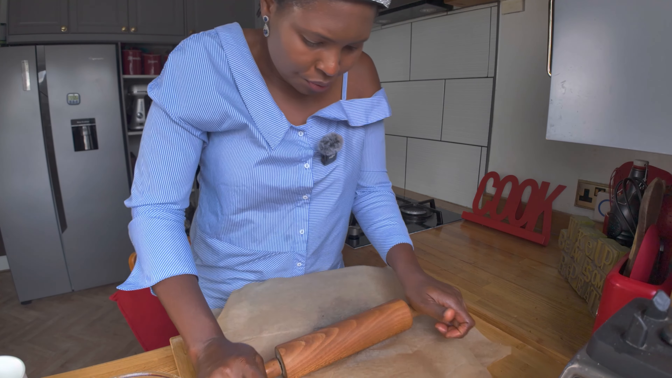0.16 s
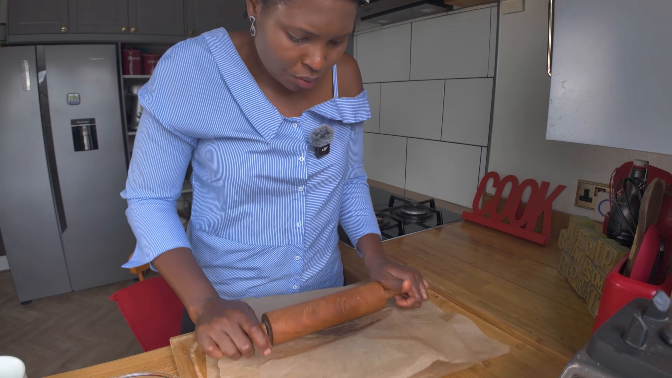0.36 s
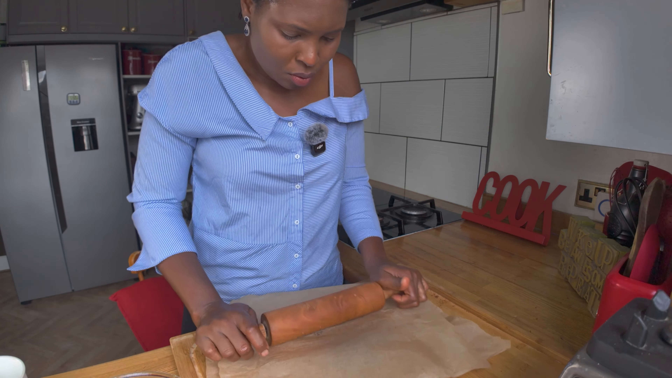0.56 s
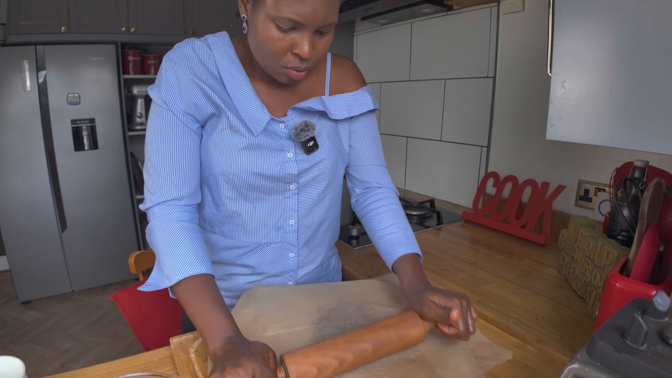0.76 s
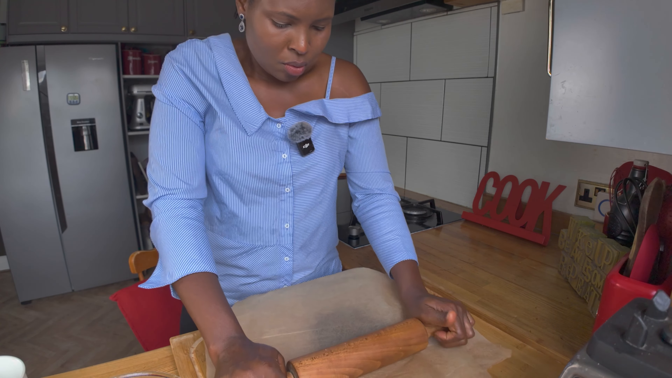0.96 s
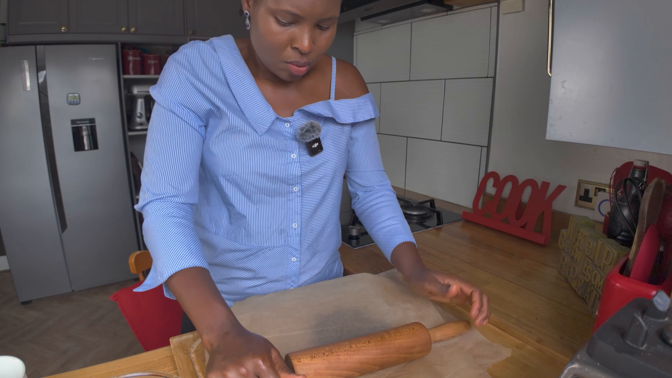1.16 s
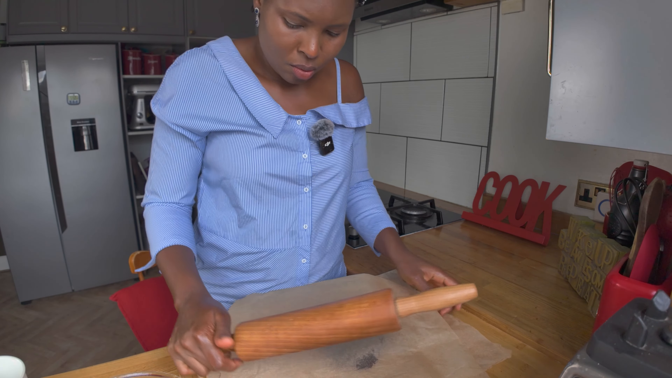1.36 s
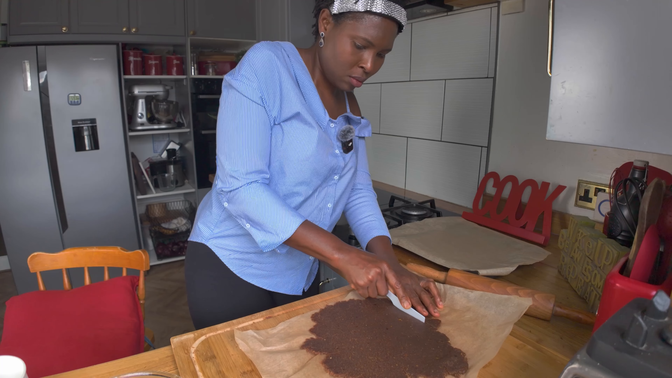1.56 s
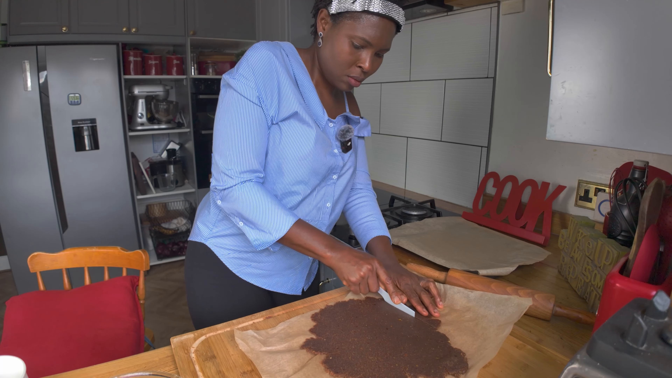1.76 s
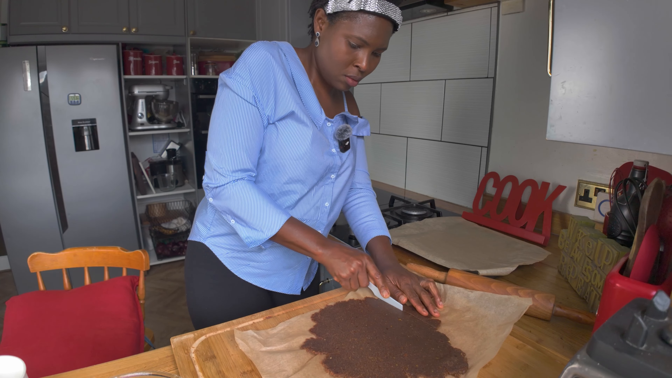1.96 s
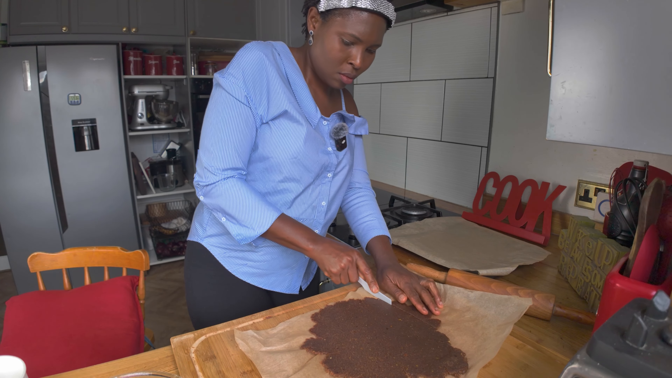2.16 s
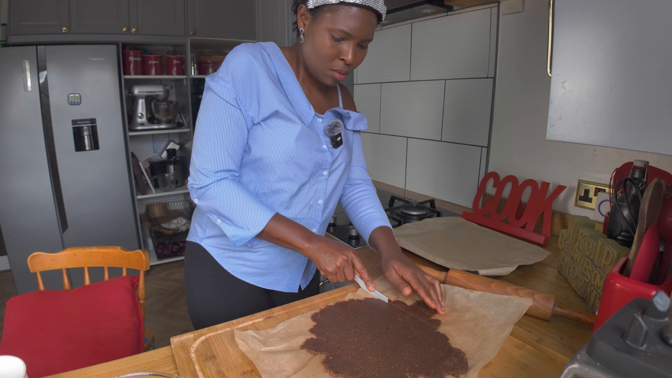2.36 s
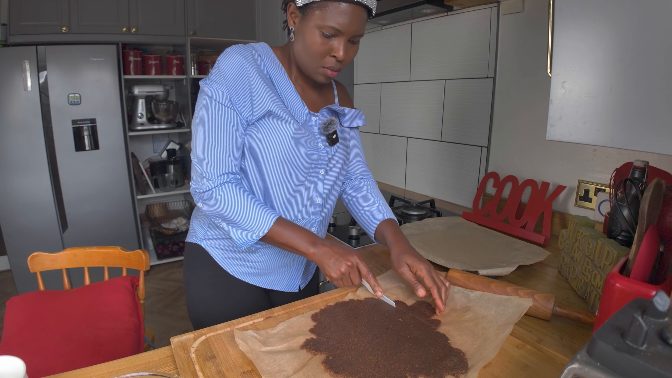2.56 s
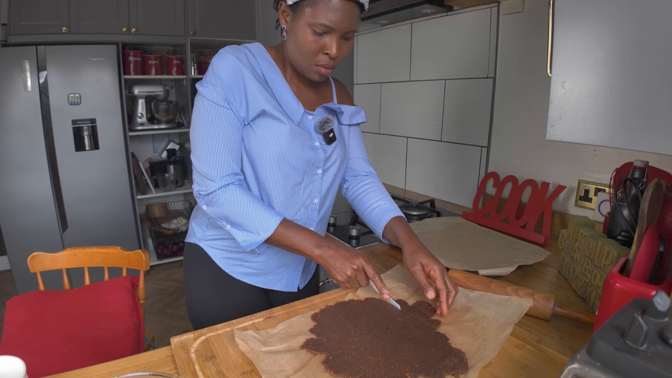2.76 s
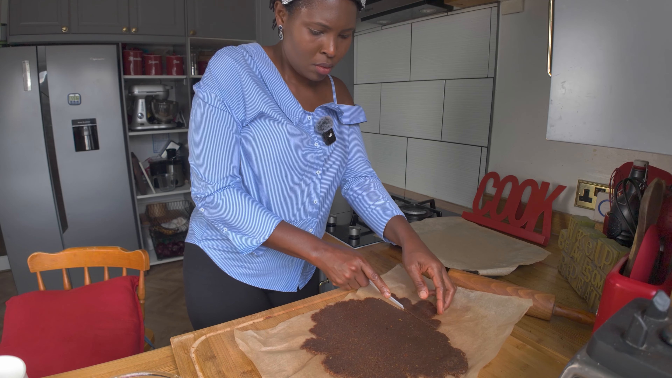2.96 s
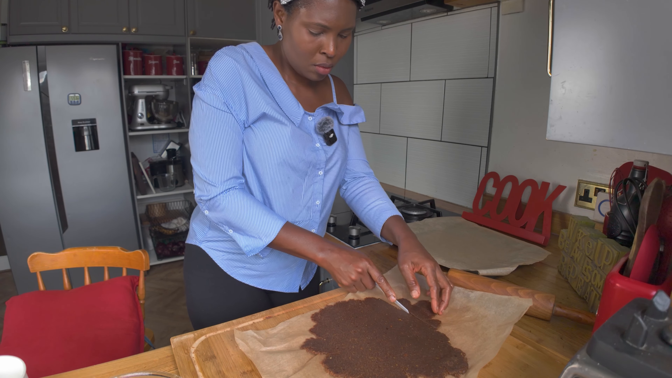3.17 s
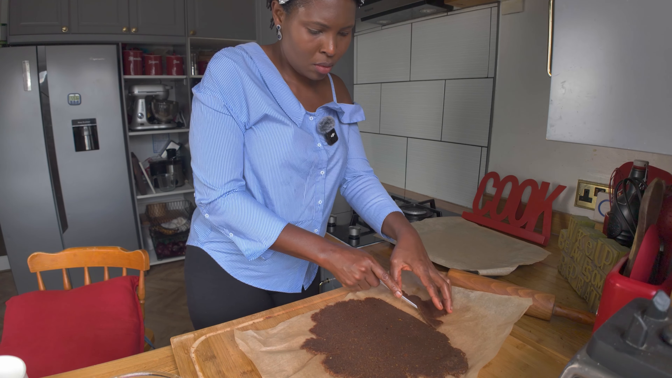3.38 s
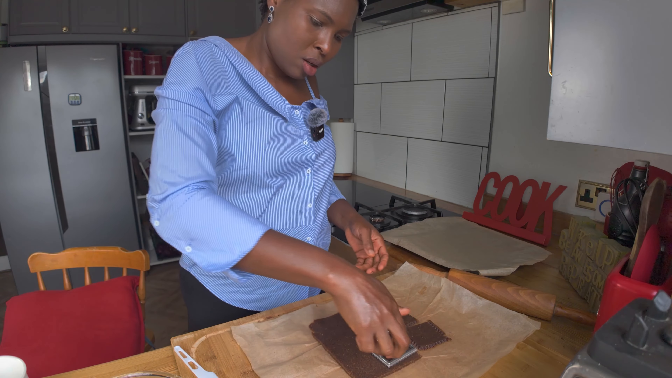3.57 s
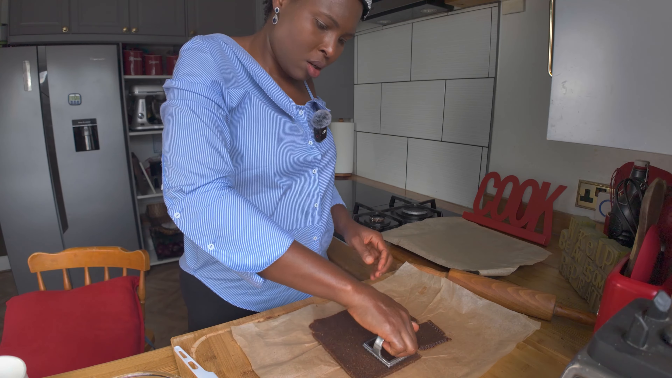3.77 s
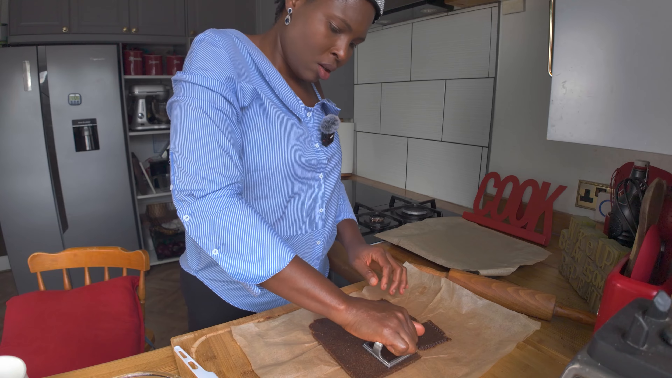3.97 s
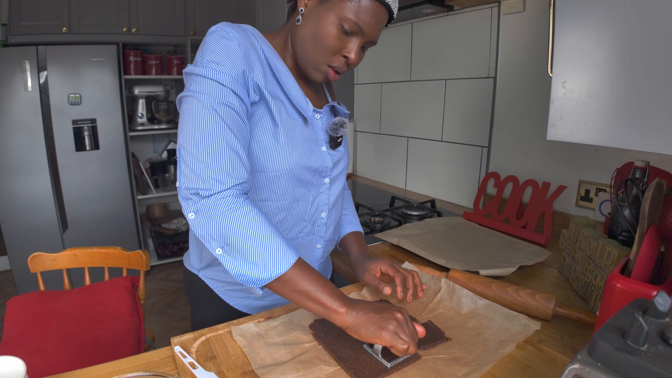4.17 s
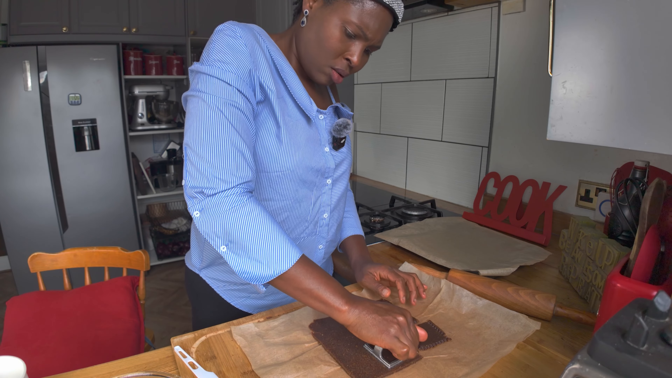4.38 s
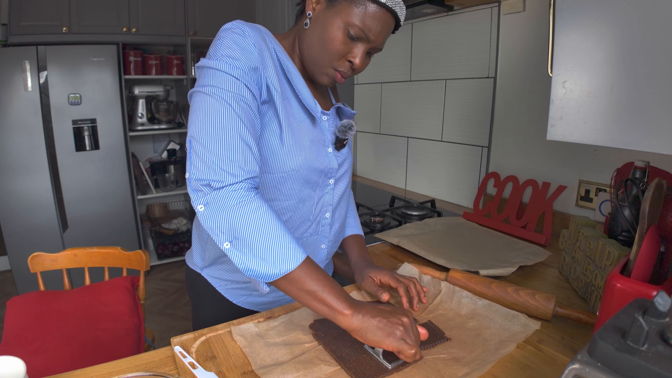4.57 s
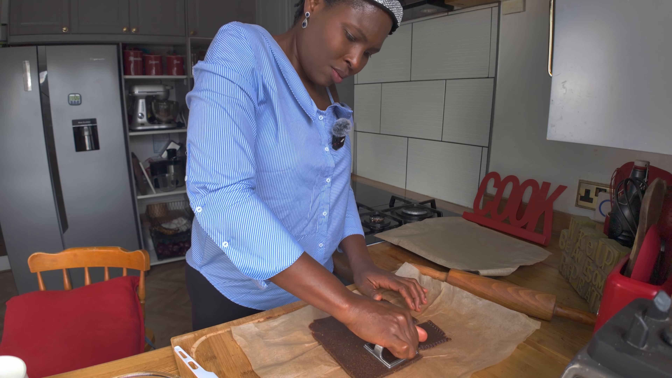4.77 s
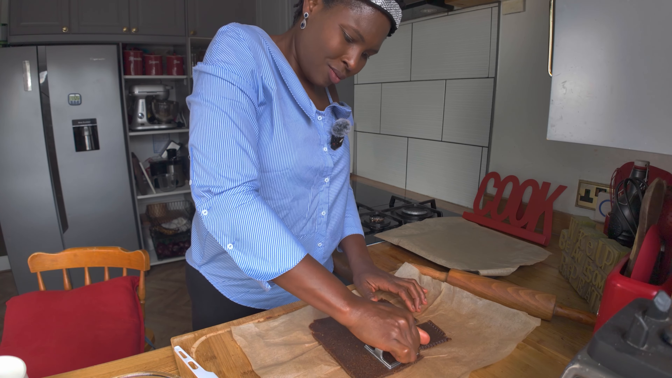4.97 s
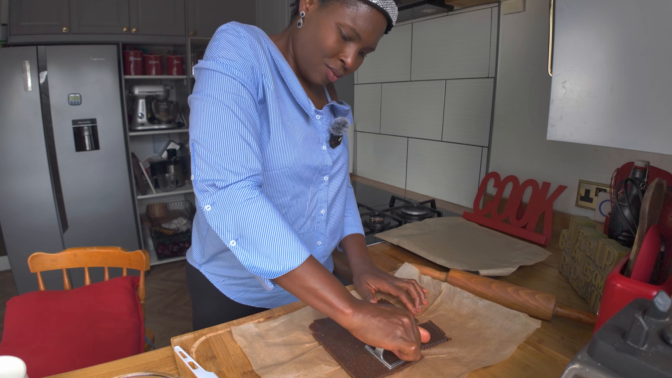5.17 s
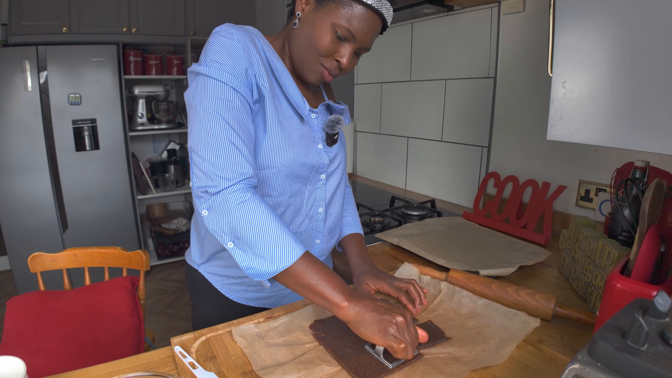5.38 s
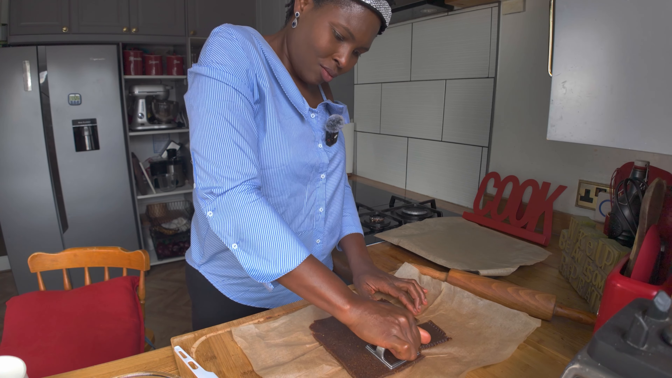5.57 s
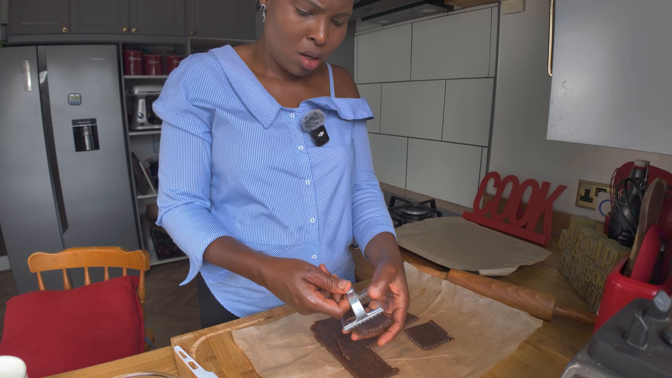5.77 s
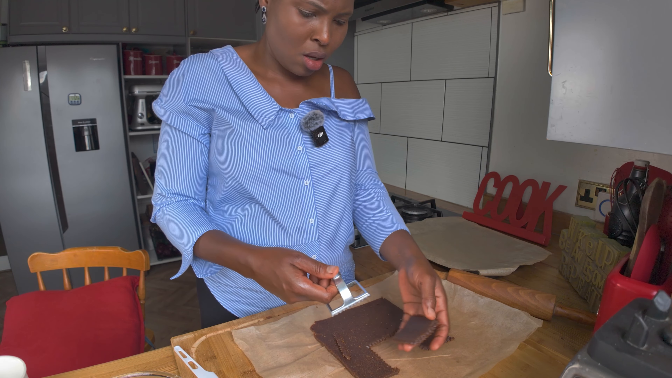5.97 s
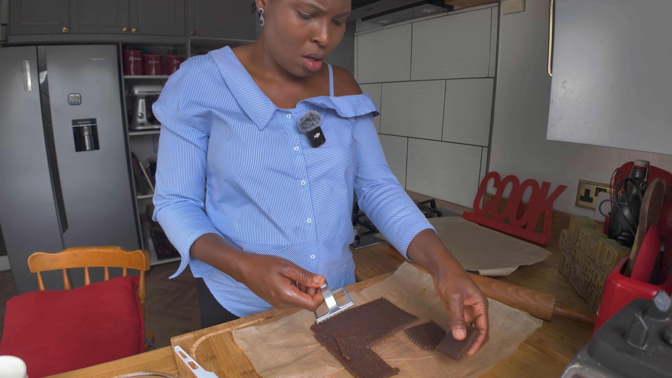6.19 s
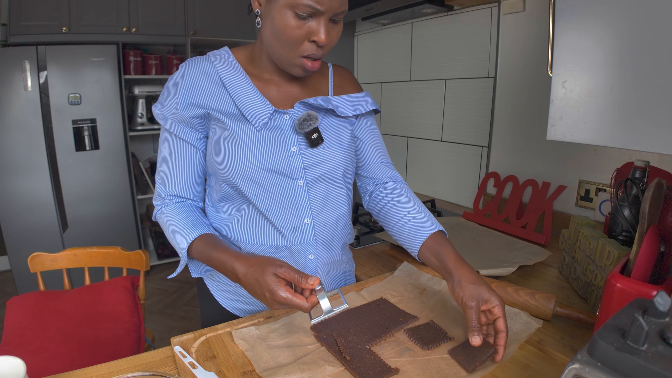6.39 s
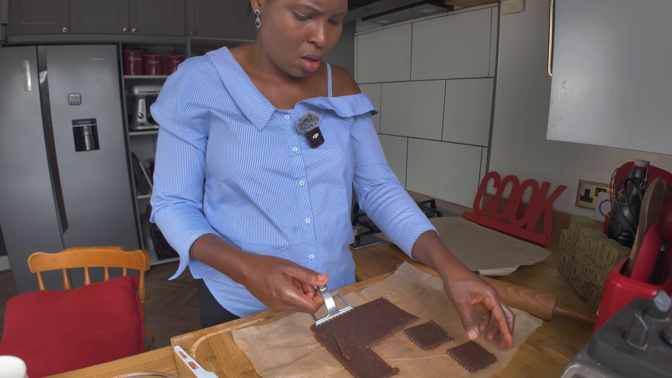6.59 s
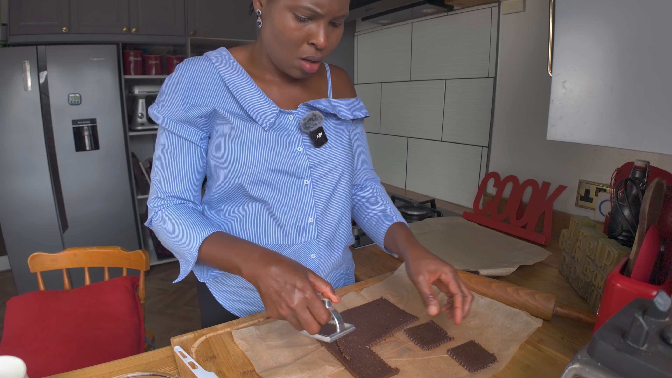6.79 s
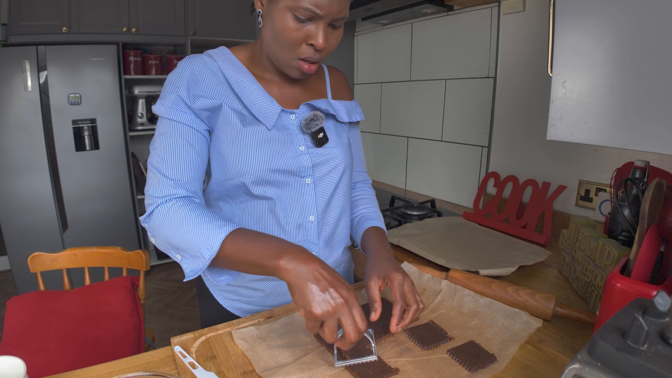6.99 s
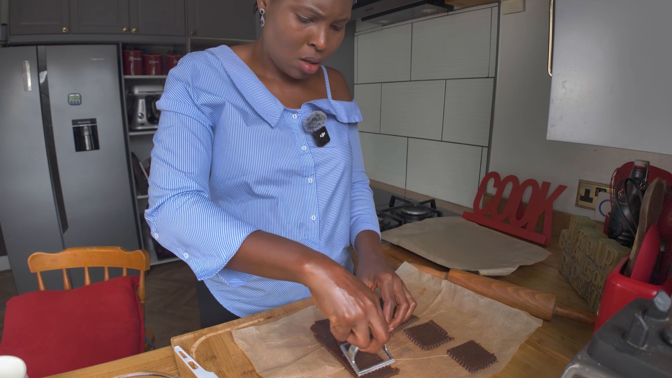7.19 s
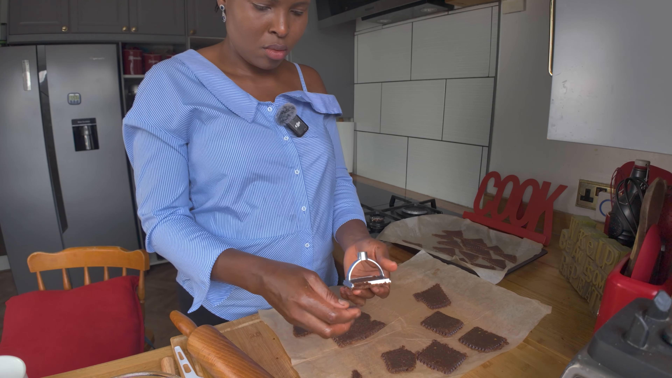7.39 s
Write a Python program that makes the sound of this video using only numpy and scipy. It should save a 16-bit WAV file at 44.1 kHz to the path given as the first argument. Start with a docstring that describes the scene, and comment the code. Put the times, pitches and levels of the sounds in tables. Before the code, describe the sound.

Close, crisp paper crinkling with wooden rumble and table knocks, dropping to faint rustles, a burst of sharp ticks, soft cloth swishes and near quiet.

```python
"""In a home kitchen, dough is rolled, trimmed and stamped out on parchment paper on a wooden table.
The sheet crackles: crowds of small ringing creases, and single snaps made of short noise bursts.
A sleeve swishes and the rolling pin rumbles (shaped noise); the table thuds (short low noise knocks).
Murmur, hiss and hum lie beneath. A microphone on the shirt hears five passages, with a brief dip
in level at each join."""
import sys
import numpy as np
from scipy import signal
from scipy.fft import rfft, irfft
from scipy.io import wavfile
from scipy.ndimage import uniform_filter1d

SR = 44100
rng = np.random.default_rng(int(sys.argv[2]) if len(sys.argv) > 2 else 0)


def int16_out(signal):
    """Quantize to a 16-bit WAV file."""
    q = np.round(np.clip(np.atleast_2d(signal).T, -1, 1) * 32767)
    wavfile.write(sys.argv[1], SR, q.astype(np.int16))


N = 328104


def amp(db):
    """Turn a level in dB into a gain."""
    return 10 ** (np.asarray(db) / 20)


def rms_one(x):
    """Scale a sound to an rms of 1."""
    return x / np.sqrt(np.mean(x ** 2) + 1e-20)


def in_time(tables):
    """Draw each table column as a curve over time, plus a gain that is 0 between the tables."""
    t = np.arange(N) / SR
    times, *columns = np.transpose(np.vstack(tables))
    inside = sum((t >= rows[0][0]) & (t <= rows[-1][0]) for rows in tables) > 0
    curves = [np.interp(t, times, column) for column in columns]
    return curves + [uniform_filter1d(inside * 1., size=300)]


def band(x, low_hz, high_hz):
    """Keep mainly what lies between two frequencies, with gentle slopes."""
    edges = [low_hz, min(high_hz, .45 * SR)]
    return signal.sosfilt(signal.butter(2, edges, "band", fs=SR, output="sos"), x)


def high_pass(x, hz):
    """Weaken what lies below a frequency."""
    return signal.sosfilt(signal.butter(3, hz, "high", fs=SR, output="sos"), x)


def ring(x, hz, t60):
    """Let each click in x start a sine that dies by 60 dB in t60 seconds."""
    r, w = amp(-60 / (t60 * SR)), 2 * np.pi * hz / SR
    return signal.lfilter([0, np.sin(w)], [1, -2 * r * np.cos(w), r * r], x + 1e-18)


def coloured(points):
    """Make noise with the given spectrum, at an rms of 1."""
    hz, db = np.transpose(points)
    f = np.arange(N // 2 + 1) * SR / N + 1
    shape = amp(np.interp(np.log(f), np.log(hz), db))
    return rms_one(irfft(rfft(rng.standard_normal(N)) * shape, N))


# The passages and their background: end t/s, murmur level/dB, hiss level/dB,
# extra level of both at the passage's start/dB
PASSAGES = [(1.554, -62, -59, 6), (3.452, -66.5, -70.5, -3.5), (5.631, -67.5, -68.5, 13.5),
            (7.27, -67.5, -74, -10.5), (7.44, -67, -74.5, -10.5)]
# Spectrum of the murmur: f/Hz, relative level per Hz/dB
MURMUR_COLOUR = [(18, -42), (30, -21.5), (215, -9.5), (327, -10.5), (397, -9.5), (449, -10.5), (616, -10),
                 (685, -10), (2000, -22), (2600, -60.5), (4400, -120)]
# Spectrum of the background hiss: f/Hz, relative level per Hz/dB
HISS_COLOUR = [(710, -38), (1200, -8.5), (1840, -11.5), (2260, -2.5), (3460, -3), (3850, -8), (6650, -6.5),
               (15500, -40.5)]
SETTLE_S = 0.1   # time constant with which the extra level dies away
MURMUR_LUMPS_DB = 1.2   # rms unevenness of the murmur
HUM_HZ, HUM_DB = 50.5, -84.5


def room_tone():
    """The low murmur of the house and a thin hiss are shaped noise; mains hum is a faint sine."""
    ends, murmur_db, hiss_db, start_db = np.transpose(PASSAGES)
    t = np.arange(N) / SR
    passage = np.minimum(np.searchsorted(ends, t), len(ends) - 1)
    since_start = t - np.r_[0, ends][passage]
    settle_db = start_db[passage] * np.exp(-since_start / SETTLE_S)
    lumps_db = MURMUR_LUMPS_DB * rms_one(band(rng.standard_normal(N), 2.1, 16))
    murmur = amp(murmur_db[passage] + settle_db + lumps_db) * coloured(MURMUR_COLOUR)
    hiss = amp(hiss_db[passage] + settle_db) * coloured(HISS_COLOUR)
    hum = amp(HUM_DB) * np.sin(2 * np.pi * HUM_HZ * t)
    return murmur + hiss + hum


# How the room echoes: f/Hz, time to die by 60 dB t/s, level relative to the other rows/dB
KITCHEN = [(523, 0.46, 12.5), (1580, 0.57, 0), (3380, 0.19, 2), (6250, 0.34, -4.5), (12460, 0.067, 12)]
KITCHEN_DB = -4.5   # energy of the whole tail against the direct sound
EARLY_DB, EARLY_S = 9, 0.045   # the start of the tail is thicker and thins out: extra level/dB, time constant/s
TABLE_ECHO_S, TABLE_ECHO_DB = 0.002, -21


def kitchen():
    """The room answers a click with the click itself, a table echo and a tail that dies by band."""
    t = np.arange(SR // 2) / SR
    tail = 0
    for hz, t60, db in KITCHEN:
        tail = tail + amp(db - 60 * t / t60) * band(rng.standard_normal(len(t)), hz / 1.89, hz * 1.16)
    build_up = np.clip(t / 0.0084, 0, 1)
    tail = tail * build_up * amp(EARLY_DB * np.exp(-t / EARLY_S))
    response = amp(KITCHEN_DB) * tail / np.sqrt(np.sum(tail ** 2))
    response[0] += 1   # direct sound
    response[round(TABLE_ECHO_S * SR)] += amp(TABLE_ECHO_DB)
    return response


# Sleeve sliding as an arm reaches out: loudest moment t/s, level there/dB, rise t/s, fall t/s
SWISHES = [(3.509, -49.5, 0.037, 0.18), (3.95, -58.5, 0.11, 0.17), (6.19, -49.5, 0.15, 0.14),
           (7.08, -53.5, 0.13, 0.14)]
# Spectrum of the sleeve: f/Hz, relative level per Hz/dB
SWISH_COLOUR = [(240, -28), (600, -12), (1490, -11), (2230, -3.5), (3600, 1.5), (4200, -6), (7000, -17),
                (11000, -35.5), (22000, -120)]
SWISH_EDGE_DB, SWISH_FLAT = 15, 2.4   # drop one rise or fall time away; higher = flatter top


def sleeve():
    """Cloth rubbing makes noise that swells smoothly and fades with each reach."""
    t = np.arange(N) / SR
    swell = 0
    for s, db, rise, fall in SWISHES:
        distance = np.maximum((s - t) / rise, (t - s) / fall)
        swell = swell + amp(db - SWISH_EDGE_DB * distance ** SWISH_FLAT)
    return swell * coloured(SWISH_COLOUR)


# Pin, hand and cutter on the table: t/s, peak level/dB, table ring f/Hz, time to die by 60 dB t/s
THUDS = [(.04, -43, 121, 0.24), (0.151, -46.5, 110, 0.16), (0.2, -41, 261, 0.36), (0.45, -31, 227, 0.34),
         (0.951, -19, 250, 0.2), (0.964, -34.5, 110.8, 0.27), (1.231, -42.5, 358, 0.18),
         (1.5, -39, 400, 0.14), (1.82, -52, 300, 0.1), (2.11, -51.5, 171, 0.38), (3.64, -38.5, 185, 0.12),
         (3.718, -58.5, 129.3, 0.11), (5.336, -42.5, 654, 0.18), (6.679, -35.5, 486, 0.21)]


def thuds():
    """A soft push shakes the damped table top: dying noise around the struck spot's pitch."""
    size = 8000   # samples; each knock is cut off here
    out = np.zeros(N + size)
    t = np.arange(size) / SR
    for (s, db, hz, t60), shake in zip(THUDS, rng.standard_normal((len(THUDS), size))):
        shake[:40] += .8   # the push, about 1 ms long
        knock = shake * amp(-60 * t / t60)
        for _ in range(2):
            knock = band(knock, hz / 2, hz * 2)
        i = round(s * SR)
        out[i:i + size] += amp(db) * knock / np.abs(knock).max()
    return out[:N]


# Spectrum of the rolling rumble: f/Hz, relative level per Hz/dB
ROLL_COLOUR = [(18, -47.5), (30, -23.5), (209, -6.5), (341, -4), (422, 1.5), (467, -6.5), (600, -9.5),
               (780, -37.5), (1320, -120)]
ROLL_DB, ROLL_END_S = -52, 1.58   # level where the sheet is worked hardest; pin is lifted by then
ROLL_FOLLOWS = 0.81   # dB of rumble per dB of working the sheet


def pin():
    """The pin rides over uneven dough and rumbles in the table, following the work on the sheet."""
    lumps = amp(2.5 * rms_one(band(rng.standard_normal(N), 4, 25)))
    work_db = uniform_filter1d(in_time(WORKING)[0], size=2000)
    down = np.clip((ROLL_END_S - np.arange(N) / SR) / .05, 0, 1)
    level = amp(ROLL_DB + ROLL_FOLLOWS * (work_db - work_db.max()))
    return level * down * lumps * coloured(ROLL_COLOUR)


CREASES_PER_S = 890   # before clumping


def creases(low_hz, high_hz, cycles, clumps):
    """Small creases pop at random in clumps, each ringing briefly at one of 16 pitches."""
    signs = rng.choice([-1, 1], N)
    born = rng.random(N) < CREASES_PER_S * clumps / SR
    dealt = rng.integers(0, 16, N)
    pitches = np.geomspace(low_hz, high_hz, 16)
    return rms_one(sum(ring(signs * born * (dealt == k), hz, cycles / hz) for k, hz in enumerate(pitches)))


# How hard the sheet is worked, one list a spell: t/s, middle creases level before RUSTLE_TRIM_DB/dB,
# fine creases level above the middle/dB, broad flexing level above the middle/dB
WORKING = [
    [(0.0, -22.5, -5.5, -3), (0.05, -16, -0.5, -5.5), (0.112, -26.5, 0, -13.5), (0.3, -31.5, -3, -10.5),
     (0.39, -20.5, -3, -10), (0.45, -19.5, -1.5, -9), (0.508, -33.5, 2.5, -6), (0.604, -35.5, -4, -4),
     (0.69, -28.5, -4, -15), (0.758, -20, -3, -5), (0.836, -26, 2, -5), (0.966, -18.5, -4.5, -12),
     (1.178, -53, 5, -13), (1.26, -44, 6, -15), (1.36, -59, -1, -5.5), (1.476, -53, -3, 0),
     (1.5, -28.5, 7, -18.5), (1.55, -17.5, -5.5, -13)],
    [(1.75, -66, -8, 3), (2.054, -67, -17, 6.5), (2.154, -50.5, 4.5, -7), (2.3, -48.5, -2, -12),
     (2.37, -47, 7.5, 8.5), (2.42, -42, 4, -10.5), (2.5, -58.5, 7, -18), (2.712, -58.5, -2, -1.5),
     (2.93, -62, -11.5, -7), (3.2, -67, -5.5, -21.5), (3.36, -57, 0.5, -24), (3.45, -72.5, 17.5, -17)],
    [(4.26, -71, -9, 3), (4.412, -67.5, -4, 2), (4.514, -45, 4, -7), (4.7, -51, 2.5, -14),
     (4.774, -98, 6, -10), (4.9, -52.5, 8, -13), (5.122, -93, 28, -3.5), (5.296, -66, -15, -18),
     (5.35, -36, 6, -9), (5.42, -55, 2, -10), (5.468, -35, -2.5, -6.5), (5.63, -77.5, 12, -18)],
    [(6.42, -66, -2.5, -13), (6.514, -56.5, 1.5, -25), (6.624, -60.5, 1.5, -19), (6.672, -43, 1.5, -27),
     (6.77, -58, -16.5, -7), (6.9, -63, -13, -12)],
]
RUSTLE_TRIM_DB = -5
CRISP_DB = -22   # crisp top against the fine part of a snap


def rustle():
    """The worked sheet crackles as middle, fine and broad creases come in the same clumps."""
    clumps = amp(3.0 * rms_one(band(rng.standard_normal(N), 12, 98)))
    middle = band(creases(3000, 4200, 2.5, clumps), 2200, 9800)
    fine = band(creases(4800, 9000, 13.0, clumps), 3700, 11000)
    crisp = band(creases(10000, 15500, 3.0, clumps), 9500, 16500)
    fine = fine + amp(CRISP_DB - 1.5) * crisp   # a little weaker here than in a snap
    broad = band(creases(1200, 2100, 2.0, clumps), 540, 3600)
    db, fine_db, broad_db, on = in_time(WORKING)
    mix = rms_one(middle) + amp(fine_db) * rms_one(fine) + amp(broad_db) * rms_one(broad)
    return amp(RUSTLE_TRIM_DB + db) * on * mix


SMALL_PER_S, SMALL_MS = 29, 4.5
SMALL_DB, SMALL_SPREAD_DB = 6, 3.5   # above the working level before its trim; size of the scatter


def small_snaps():
    """Lesser creases give way at random moments, their strength and colour scattered about the rustle."""
    *levels, on = in_time(WORKING)
    count = round(SMALL_PER_S * N / SR)
    at = rng.integers(0, N, count)
    scatter = rng.uniform(-1.3, 1, (count, 3))
    levels = np.transpose(levels)[at] + [SMALL_DB, 0, 0] + SMALL_SPREAD_DB * scatter
    return [(i / SR, *row, SMALL_MS) for i, row in zip(at, levels) if on[i] > 0]


# Single creases giving way: t/s, middle part peak level/dB, fine part level above the middle/dB,
# broad part level above the middle/dB, length/ms
SNAPS = [(0.0206, -24, -10, -6, 2.1), (0.0359, -7.5, -7, -7, 2.2), (0.0599, -8.5, -3, -11, 2.6),
         (0.1571, -17.5, -4, -7, 6.1), (0.2147, -14.5, -12, -3.5, 3.6), (0.3493, -15.5, 0, -25, 4.6),
         (0.3845, -18.5, 1, 2, 4.7), (0.4308, -6.5, 0.5, -3, 3.2), (0.4539, -6, -29, -7.5, 7.3),
         (0.5253, -11.5, -3, -7.5, 2.2), (0.5662, -16.5, 0, -4.5, 3.5), (0.6323, -25.5, -21, -1, 3.5),
         (0.7211, -13, -4, -5.5, 3.5), (0.7366, -12.5, -7, -2, 8.1), (0.9497, -11.5, 0.5, -7, 5.2),
         (1.0608, -18.5, -1.5, -30, 5.1), (1.1368, -27, -23, -19, 6.3), (1.2435, -28, 1, -14, 3.2),
         (1.275, -24, -16, -21, 2.2), (1.416, -50, 10, -10, 1.4), (1.499, -16, 5.5, -23, 5.8),
         (1.5137, -9.5, -5, -16.5, 4.9), (1.5384, -13.5, -17.5, -20.5, 3.05), (1.6521, -56.5, -3.5, 3, 3.5),
         (1.765, -45, 4.5, -7, 3.1), (1.819, -44.5, 2, 2.5, 3.1), (1.8454, -52, -11, -6, 3.5),
         (1.8911, -48.5, 1, -21, 2.8), (1.9233, -52.5, 3.5, 9.5, 4.4), (1.958, -55, 9, -1, 2.9),
         (1.9812, -50, -5, 3, 3.5), (2.0014, -48, -10.5, 3, 4), (2.0174, -46.5, -2, -2, 1.7),
         (2.1037, -38, 12, -11, 10.5), (2.1937, -34, 8.5, -8.5, 9.7), (2.244, -40.5, 7, -16, 2.7),
         (2.299, -40, 3, -0.5, 6.9), (2.3658, -36, 11, 5.5, 3.5), (2.373, -26.5, 4, -2, 3.1),
         (2.4102, -28, 9, 3.5, 2.9), (2.432, -27, 4, -21, 5.1), (2.5064, -34, 6, -24, 3.1),
         (2.585, -48, 8, -28, 4.3), (2.622, -49, 14, -8, 3.8), (2.767, -43.5, 0, -16, 2.8),
         (2.9422, -33, -9, -20, 5.2), (2.9539, -28.5, -30, -32, 2.1), (2.9626, -30.5, -12, -30, 4.4),
         (3.0694, -30, -1.5, -27, 1.6), (3.0835, -26, 2, -25, 3.2), (4.3026, -42.5, -8, -16, 3.9),
         (4.332, -36.5, -1, -20, 10), (4.351, -23, -8, -38, 4.7), (4.3762, -38, -3, -29, 3.5),
         (4.4464, -49, 5, -22, 4.6), (4.4488, -30, 3.5, -12, 4.1), (4.465, -18.5, -9, -26, 1.7),
         (4.4937, -25, -6.5, -24, 2.6), (4.5338, -19, 2.5, -17.5, 1.5), (4.5835, -9.5, -5.5, -27, 3.3),
         (4.5905, -13.5, -8, -24, 2.5), (4.5966, -24, 8, -11, 1.2), (4.6576, -17, -6, -27, 1.9),
         (4.671, -24, -4, -32, 1.3), (4.6917, -20, -1, -35, 2.4), (4.7097, -26, -3, -18, 2.8),
         (4.7266, -23.5, 1.5, -35, 1.9), (4.7495, -33, 0, -36, 2.4), (4.8341, -17, -1, -34, 2),
         (4.8536, -27, 1.5, -20.5, 2.3), (4.9015, -33, -20, -25, 2), (4.9229, -26, -9, -27, 2.1),
         (4.9305, -27, 2.5, -34, 5.2), (5.0079, -32.5, 0, -12, 3.5), (5.0181, -16.5, -1, -18.5, 2.8),
         (5.0572, -37.5, 10, -27, 2.4), (5.1272, -46, -3, -14, 2.5), (5.178, -38, -13, -13.5, 5.3),
         (5.286, -49.5, -7, -17, 8.4), (5.2975, -38, -4.5, -13.5, 4.6), (5.3289, -27, -6, -7, 3.1),
         (5.3337, -9, -0.5, -16, 2.4), (5.3624, -28.5, 1, -14, 2.5), (5.4385, -32, -18, -13, 3.5),
         (5.4604, -23, -16, -22, 8.2), (5.4838, -17.5, -2.5, -27, 4.1), (5.5111, -25.5, -6, -37, 3.5),
         (5.5784, -34.5, -3, -25, 9.1), (5.918, -52.5, -8.5, -12.5, 3.5), (6.452, -46, -14, -31.5, 3.9),
         (6.474, -29.5, -3, -30, 10.5), (6.521, -41.5, 2, -24, 3.8), (6.58, -47, -3, -17, 4.6),
         (6.5982, -38, -4, -18, 10), (6.657, -37, -5, -31, 4), (6.6737, -22.5, -3, -16.5, 5.7),
         (6.68, -34, -3, -29, 2.5)]
# Middle, fine, broad and crisp parts of a snap, first of two filters: low f/Hz, high f/Hz
# (band() lowers a high edge that is out of reach)
SNAP_BANDS = [(2397, 4590), (5100, 7490), (1004, 1803), (9800, 28000)]


def snaps():
    """A crease flips with a click and runs on along the fold for a few milliseconds."""
    size = 900   # samples per snap
    out = np.zeros(N + size)
    t_ms = np.arange(size) / SR * 1000
    rows = list(SNAPS) + small_snaps()
    for (s, db, fine_db, broad_db, ms), tear in zip(rows, rng.standard_normal((len(rows), size))):
        tear[0] = 2.0   # the click
        tear *= np.exp(-t_ms / (0.85 * max(ms, .3)))
        parts = [band(band(tear, low, high), 1.17 * low, 1.6 * high) for low, high in SNAP_BANDS]
        levels = [0, fine_db, broad_db, fine_db + CRISP_DB]
        snap = sum(amp(level) * part / np.abs(part).max() for level, part in zip(levels, parts))
        i = round(s * SR)
        out[i:i + size] += amp(db) * snap
    return out[:N]


SPOT_S = .06   # time the hands stay at one spot of the sheet
STILL_S = .03   # every passage but the first opens on a still sheet
SHEET_LOW_HZ = 794   # the thin sheet gives off little sound below this
FADE_S = 0.0096   # length of the dip on each side of a join


def scene():
    """The paper echoes in the kitchen, passage by passage; the other sounds are added without echo."""
    paper, heard = rustle() + snaps(), np.zeros(N)
    spot = np.repeat(rng.integers(0, 3, 600), round(SPOT_S * SR))[:N]
    joins = np.transpose(PASSAGES)[0, :-1]
    edges = [0] + [round(s * SR) for s in joins] + [N]
    for k in range(3):   # each of three spots has its own echo pattern
        room, here = kitchen(), paper * (spot == k)
        for a, b in zip(edges, edges[1:]):
            moving = (np.arange(b - a) > STILL_S * SR) | (a == 0)
            # a join cuts the echo off
            heard[a:b] += signal.fftconvolve(here[a:b] * moving, room)[:b - a]
    heard = high_pass(heard, SHEET_LOW_HZ)
    out = heard + sleeve() + pin() + room_tone() + thuds()
    to_join = np.min(np.abs(np.arange(N) / SR - joins[:, None]), axis=0)
    return (out * np.clip(to_join / FADE_S, .05, 1))[None]


MIC_HISS_DB, MIC_HISS_HZ = -86, 9000   # steady self-noise, mainly above this
CUTOFF_HZ = 16400


def record(dry):
    """The microphone drops deep bass, rounds off peaks, hisses faintly and cuts the top steeply."""
    x = high_pass(dry, 45)
    x = .75 * np.tanh(x / .75)
    x = x + amp(MIC_HISS_DB) * rms_one(band(rng.standard_normal(N), MIC_HISS_HZ, CUTOFF_HZ))
    return signal.sosfilt(signal.cheby2(16, 80, CUTOFF_HZ, fs=SR, output="sos"), x)


dry = scene()
out = record(dry)
int16_out(out)
```